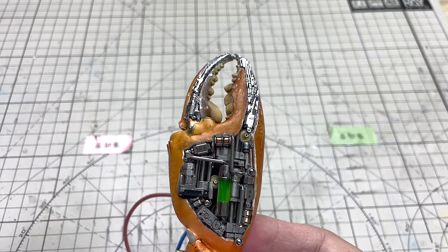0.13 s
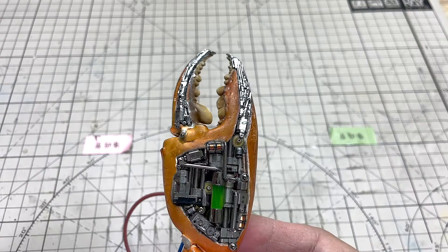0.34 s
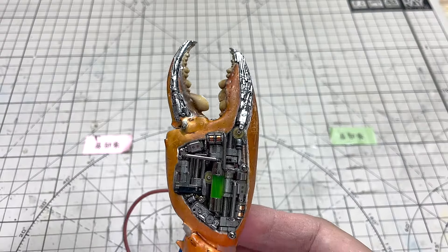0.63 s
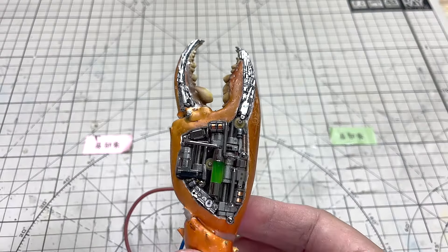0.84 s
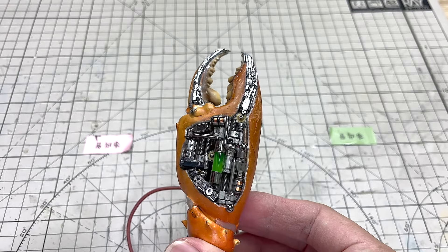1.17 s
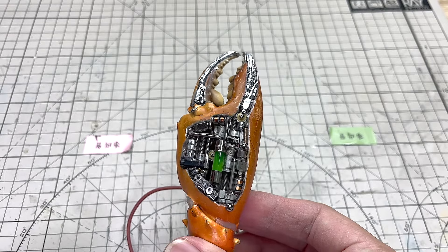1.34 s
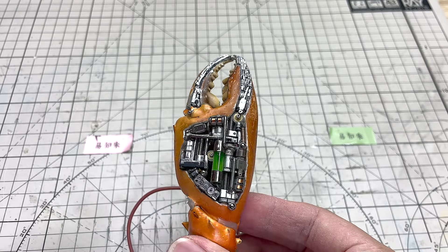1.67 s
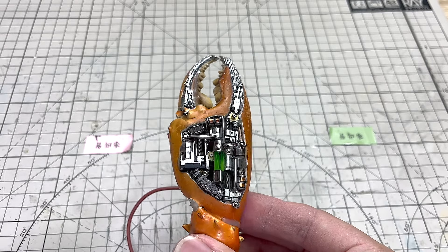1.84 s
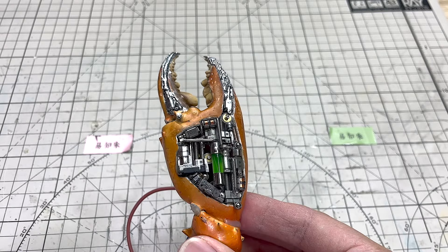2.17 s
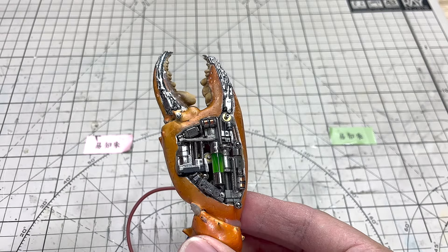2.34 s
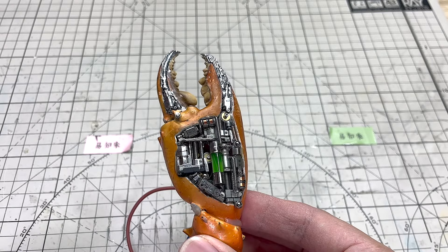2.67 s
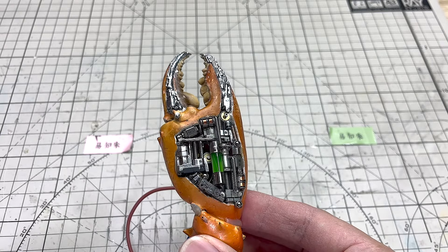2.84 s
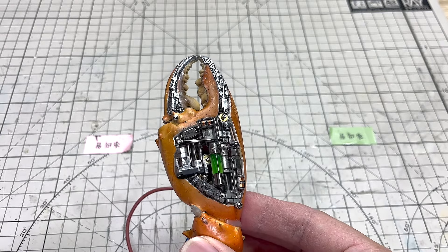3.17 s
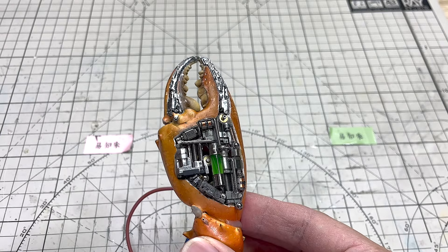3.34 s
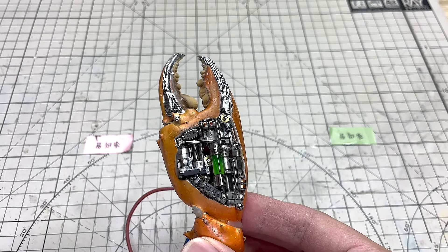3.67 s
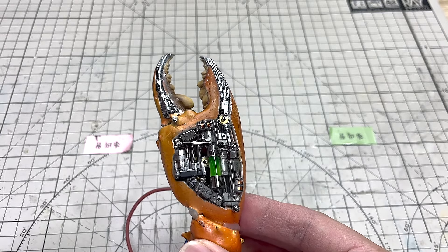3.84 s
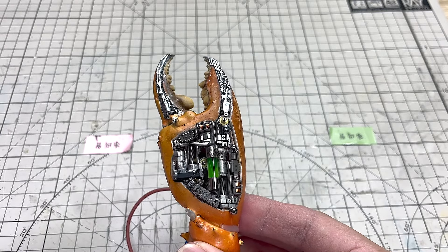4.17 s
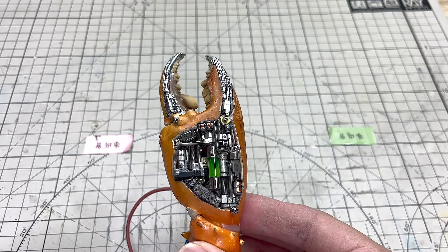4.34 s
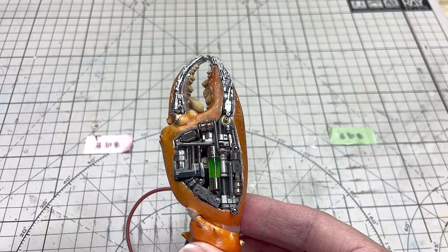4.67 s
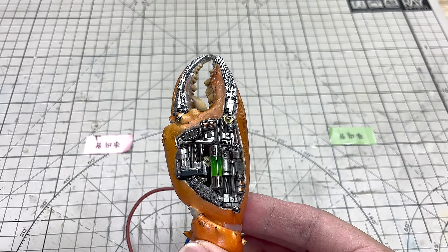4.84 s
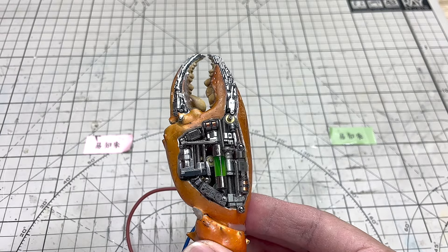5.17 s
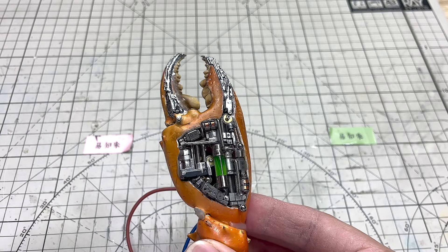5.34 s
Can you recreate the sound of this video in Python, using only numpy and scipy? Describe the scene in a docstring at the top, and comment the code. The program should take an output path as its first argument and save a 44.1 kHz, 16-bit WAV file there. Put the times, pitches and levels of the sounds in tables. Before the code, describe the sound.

Fizzy, metallic gear rattle runs throughout, thin and treble-heavy, recorded in stereo at a worktable. A very short louder start cuts to a steadier, more distant whir. Three times the motor strains, slows and sings sharply, then springs back to speed. Between the first and second strains a muted bump hits the bench. Beneath lie low room rumble and a faint swelling deep drone.

```python
"""Bright hiss of gear teeth in a hand-held mechanical claw, driven by a tiny three-pole motor: noise through
shell resonances. At each jaw closing the motor labours and slows, and the teeth sing clean shaft-locked sines.
Beneath: low room rumble (shaped noise), a swelling drone and a faint hum. Once, a soft thump on the bench
(pulses into decaying modes); later a faint tone in two swells (gliding sine). Two microphone ports.
The first 44 ms are heard from closer, louder and brighter.
"""
import sys
import numpy as np
from scipy import signal
from scipy.fft import rfft, irfft
from scipy.io import wavfile

SR = 44100
rng = np.random.default_rng(int(sys.argv[2]) if len(sys.argv) > 2 else 0)


def log_audio(samples):
    """Write samples as a 16-bit WAV file to the path given in sys.argv[1]."""
    # one column per channel
    frames = np.atleast_2d(samples).T
    # limit to full scale, then quantise
    limited = np.clip(frames, -1, 1)
    pcm = np.round(limited * 32767).astype(np.int16)
    wavfile.write(sys.argv[1], SR, pcm)


N = 242991
T_S = np.arange(N) / SR
HZ = np.fft.rfftfreq(N, 1 / SR)[1:]   # DC left out

# Shaft-locked lines, 3 poles and 9 pinion teeth: multiple of shaft speed/1,
# line amplitude re rattle rms, running free/dB, labouring/dB
SHAFT_LINES = [(3, -13, -8), (4, -15.5, -13), (5, -26, -23), (6, -25, -12.5), (7, -21, -30), (8, -27, -30),
               (9, -19, -14.5), (10, -24, -25), (11, -23, -21), (12, -27, -20), (13, -27, -23),
               (14, -32, -23), (15, -30, -16.5), (18, -30, -20), (20, -35, -23), (21, -35, -18),
               (23, -23, -21), (24, -35, -20), (27, -35, -13), (30, -35, -20), (33, -35, -15),
               (36, -35, -13), (39, -35, -16), (42, -35, -18), (45, -35, -19), (48, -35, -19),
               (51, -35, -15.5), (52, -35, -19), (55, -35, -19), (57, -32, -12), (60, -30, -14.5)]
# Rattle throb with the turning parts: multiple of shaft speed/1, depth free/dB, depth labouring/dB
RATTLE_THROBS = [(.36, .5, 1.5), (1, .4, .7), (2, .6, .4), (3, .9, 1.2), (9, .3, 2.2)]
# Shell radiation slope: f/Hz, gain/dB
SHELL_SLOPE = [(300, -37.5), (600, -25.5), (1000, -18.5), (1400, -23.5), (1850, -14.5), (2100, -6),
               (3000, 2.5), (4300, -5.5), (7200, -6), (8600, -1.5), (10400, -4.5), (12000, 1),
               (13500, -1.5), (14600, -6.5), (15500, -22)]
# Shell resonances: f/Hz, width/Hz, gain above slope/dB
SHELL_RESONANCES = [(2110, 110, 4), (2600, 99, 0), (5205, 520, 11.5), (5990, 510, 6.5), (6510, 250, 4),
                    (8012, 996, 16.5), (9160, 810, -8.5), (13900, 390, -1)]
# Two microphone ports: f/Hz, right re left/dB, right leads by/turns, likeness/0-1
PORT_DIFFERENCES = [(300, 0, -.05, .7), (750, -1.5, -.23, .85), (1100, -1, -.17, .75),
                    (1600, -1.5, -.1, .6), (2400, -4, -.17, .65), (3200, -9, -.38, .6),
                    (4200, -7, -.75, .2), (4900, -1, -1.0, .9), (5300, -5, -.93, .8), (5750, -3, -.65, .35),
                    (6400, -1, -.83, .6), (7100, -2, -.55, .4), (7900, -2, -.58, .92), (8350, 0, -.5, 1),
                    (9100, 0, -.5, 1), (10500, 0, -.33, .65), (12500, 0, -.09, .85), (12950, 0, 0, 1)]
# Rumble spectrum shape: f/Hz, relative level per Hz/dB
RUMBLE_SPECTRUM = [(30, -9), (50, -10.5), (80, -1), (105, -2), (140, -9.5), (200, -8.5), (300, -16.5),
                   (470, -27), (600, -36), (800, -58)]
# Rumble likeness between ports: f/Hz, likeness/0-1
RUMBLE_LIKENESS = [(60, 0.75), (200, 0.82), (600, 0.03)]
# Faint tone, two swells: t/s, f/Hz, level/dB
FAINT_TONE_TRACK = [(3.36, 670, -100), (3.39, 683, -74), (3.42, 710, -73), (3.45, 696, -85),
                    (3.485, 716, -70), (3.52, 710, -95), (3.6, 710, -100)]
# Contacts on the bench: t/s, level/dB, hardness/(dB per octave)
BENCH_CONTACTS = [(2.45, -61, 2.5), (2.468, -59.5, 3), (2.489, -51, -5.5), (2.546, -58.5, -2),
                  (2.585, -62.5, -4)]
# Bench-top modes: f/Hz, level/dB, t60/s
BENCH_MODES = [(54.6, -8, 0.25), (72, -1.5, 0.15), (125, -2, 0.13), (169.5, -5, 0.46), (192, -11, 0.31),
               (312, -11.5, 0.17), (427, -8, 0.1)]
# Gain of the closer sound over the farther one: f/Hz, gain/dB
CLOSER_GAIN = [(60, 6.5), (120, 2), (250, 19), (600, 4), (1500, 5), (3500, 10.5), (7000, 8), (11000, 4),
               (13000, 17), (15000, 20)]
# Frequency bands of the claw sound, flickering partly together and partly apart: upper edge f/Hz,
# slope/(dB per unit sheen), slope/(dB per unit load), share of treble level/0-1
CLAW_BANDS = [(1116, 1.5, -6.5, 0), (1754, 3.5, 5, 0), (3260, 0.86, -4, 0), (4730, -1.5, -4.5, 0.48),
              (7680, -0.5, -0.5, 0.16), (8800, -4.5, 0, 0.4), (9220, -6, 10, 0.37), (10350, 11.5, -1, 1),
              (20000, -1.3, -2.5, 0.86)]
# Deep drone resonance: f/Hz, width/Hz
DRONE_RESONANCE = (52.5, 24)
# Jaw closings: t/s, slowest speed/(turns/s), mid-band strain/dB, treble strain/dB, squeal on the way
# down and up/dB, squeal at the slowest/dB, upper squeal/dB, pole hum/dB
JAW_CLOSINGS = [(-0.12, 222, 0, 0, -5, -15, -10, 0), (1.534, 222, 1, -1.5, -8, -4, -7, -1.5),
                (3.188, 224, -.5, 0, -4, -24, -3, -2), (4.83, 221.6, -.7, 0, -2.5, -24, -10, -3)]
# Shaft slow-down over a cycle: t from closing/s, share of slow-down/1 (< 0: freed motor overshoots)
SHAFT_SLOWING = [(-.4, -.04), (-.2, 0), (-.15, .03), (-.11, .17), (-.08, .39), (-.055, .65), (-.03, .89),
                 (0, 1), (.03, .87), (.055, .75), (.08, .53), (.11, .29), (.15, 0), (.22, -.11), (.33, -.1),
                 (.45, 0), (.6, .06), (.77, .03), (.9, -.04), (1.05, -.09), (1.26, -.04)]
# Rattle over a cycle (strain, slack, jaws open): t from closing/s, mid-band level/dB, treble level/dB
RATTLE_LEVELS = [(-.4, -44.5, -39.5), (-.16, -44.5, -37.5), (-.07, -42.5, -31), (-.02, -40, -32),
                 (.07, -42, -32.5), (0.152, -45.5, -42), (.32, -46.5, -41), (.42, -45.5, -39),
                 (.65, -44, -36.5), (.85, -45, -40), (1.1, -45.5, -41), (1.26, -46, -40.5)]
# Brief flares of the rattle: t/s, rise/dB
RATTLE_FLARES = [(.24, 3.5), (1.09, 3), (1.96, 1), (3.69, 1.5), (4.22, 4), (5.401, 3)]
# Colour drift from 9-11 kHz towards 5-8 kHz: t/s, sheen/0-1
SHEEN_TRACK = [(0, 1), (.7, 1), (1.0, 0.85), (1.7, 0.57), (2.0, 0), (3.5, 0.2), (5.51, 0.23)]
# Drone swells: t/s, level above rest/dB
DRONE_SWELLS = [(.19, 11), (.83, 14.5), (1.2, 8.5), (1.5, 6.5), (1.89, -2), (2.8, 7), (3.45, 7.5),
                (3.92, 8), (4.3, 4.5), (4.591, 1), (5.26, 4.5), (5.5, 8)]

FREE_TURNS_PER_S, LABOURING_TURNS_PER_S = 257, 224
CYCLE_LEAD_S = .4   # a cycle starts this long before the jaws meet
MESH_PLAY_TURNS = .0017   # play between teeth, blurs the high lines
STUTTER_TURNS, HIGHEST_HUM_MULTIPLE = .012, 7
SQUEAL_MULTIPLE, UPPER_MULTIPLE = 54, 63   # six and seven times the tooth rate
SQUEAL_LOUDEST_HZ, SQUEAL_RANGE_HZ, SQUEAL_SLOWEST_POWER = 12850, 520, 3.0
FLARE_S = 0.02
DULL_DB, DULL_BELOW_HZ = -40, 2100   # lowest bands: base level does not follow the cycle
FINE_SPACING_HZ, FINE_DB, FINE_UP_TO_HZ = 35, 2.4, 8000   # fine random ripple of the shell response
CLOSER_UNTIL_S, CLOSER_FADE_S = 0.0442, 0.003
RUMBLE_DB, RUMBLE_WANDER_DB, DRONE_DB = -68, 1.4, -68.5
SWELL_RISE_DB_PER_S, SWELL_FALL_DB_PER_S, RUMBLE_DB_PER_SWELL_DB = 112, 27, 0.098
AFTER_THUMP_DB, AFTER_THUMP_S = 9.5, 0.3
HUM_HZ, HUM_DB, HUM_WAVER_DB = 194.5, -76.5, 4
CUTOFF_HZ = 15750


def amp(db):
    """dB to amplitude ratio."""
    return 10 ** (np.asarray(db) / 20)


def rms_one(x):
    """Scale to rms 1."""
    return x / np.sqrt(np.mean(x ** 2))


def in_time(rows):
    """Table columns interpolated at every sample."""
    s, *columns = np.transpose(rows)
    return [np.interp(T_S, s, column) for column in columns]


def over_hz(rows):
    """Table columns interpolated over log frequency."""
    hz, *columns = np.transpose(rows)
    return [np.interp(np.log(HZ), np.log(hz), column) for column in columns]


def shaped(x, response):
    """Filter by a complex frequency response."""
    return irfft(rfft(x) * np.append(0, response), N)


def resonance(hz, width_hz):
    """Bell over frequency, peak 1, half height at half a width from centre."""
    return 1 / (1 + (2 * (HZ - hz) / width_hz) ** 2)


def sine(turns):
    """Sine of a phase in turns."""
    return np.sin(2 * np.pi * turns)


def drift(rate_hz):
    """Slow chance: noise twice low-passed, run in for 0.5 s, rms 1."""
    r = np.exp(-2 * np.pi * rate_hz / SR)
    noise = rng.standard_normal(N + SR // 2)
    return rms_one(signal.lfilter([1], [1, -2 * r, r * r], noise)[SR // 2:])


def cycle():
    """Time from the current closing, and that closing's columns, at every sample."""
    t_s = np.maximum(T_S, CLOSER_UNTIL_S)   # cycle stands still until then
    rows = np.array(JAW_CLOSINGS)
    current = rows[np.searchsorted(rows[:, 0] - CYCLE_LEAD_S, t_s) - 1]
    return t_s - current[:, 0], *current[:, 1:].T


def tooth_rattle(turns, load):
    """Uneven teeth: two unrelated noises under one throb locked to the shaft."""
    throb_db = 0
    for k, free_db, hard_db in RATTLE_THROBS:
        depth_db = free_db + (hard_db - free_db) * load
        throb_db = throb_db + depth_db * np.cos(2 * np.pi * (k * turns + rng.random()))
    return rng.standard_normal((2, N)) * amp(throb_db + 1.0 * drift(1200))


def tooth_squeal(turns, speed, slowing, load, flank_db, bottom_db, upper_db):
    """Tooth-rate harmonics: one sings in a band the shell favours and when slowest, one grows with load."""
    in_range = np.exp(-((SQUEAL_MULTIPLE * speed - SQUEAL_LOUDEST_HZ) / SQUEAL_RANGE_HZ) ** 2)
    at_slowest = np.clip(slowing, 0, 1) ** SQUEAL_SLOWEST_POWER
    level = amp(flank_db) * in_range + amp(bottom_db) * at_slowest
    squeal = level * amp(2.5 * drift(60)) * sine(SQUEAL_MULTIPLE * turns)
    upper = amp(upper_db + 2 * drift(40)) * load ** 2 * sine(UPPER_MULTIPLE * turns)
    return squeal + upper


def shaft_lines(turns, load, hum_db):
    """Poles and teeth sing sines at multiples of shaft speed."""
    stutter_turns = STUTTER_TURNS * load * drift(23)   # labouring armature stumbles, blurs its hum
    out = 0
    for k, free_db, hard_db in SHAFT_LINES:
        is_hum = k <= HIGHEST_HUM_MULTIPLE
        level_db = free_db + (hard_db - free_db) * np.minimum(1.4 * load, 1)
        level_db = level_db + is_hum * hum_db * load
        level_db = level_db + min(2 + k / 12, 3) * drift(15)
        out = out + amp(level_db) * sine(k * (turns + is_hum * stutter_turns) + rng.random())
    return out


def band_levels(force, since_s, load, mid_strain_db, treble_strain_db):
    """Split the force into bands; set each level by cycle, sheen, load, shared and separate flicker."""
    s, mid_db, treble_db = np.transpose(RATTLE_LEVELS)
    flare_db = sum(db * np.exp(-((T_S - at_s) / FLARE_S) ** 2) for at_s, db in RATTLE_FLARES)
    mid_db = np.interp(since_s, s, mid_db) + flare_db + mid_strain_db * load
    treble_db = np.interp(since_s, s, treble_db) + flare_db + treble_strain_db * load
    sheen, = in_time(SHEEN_TRACK)
    together = drift(15.0)
    spectrum = rfft(force)
    out, below = 0, 0
    for edge_hz, sheen_db, load_db, share in CLAW_BANDS:
        low_pass = np.append(1, 1 / (1 + (HZ / edge_hz) ** 30))
        base_db = mid_db + share * (treble_db - mid_db) if edge_hz > DULL_BELOW_HZ else DULL_DB
        flicker_db = 0.47 * together + 0.73 * drift(22) + 0.64 * drift(23)
        level_db = base_db + sheen_db * sheen + load_db * load + flicker_db
        out = out + irfft(spectrum * (low_pass - below), N) * amp(level_db)
        below = low_pass
    return out


def motor():
    """Shaft slows under load; returns rattle + lines, unrelated rattle, and lines as force on the shell."""
    (since_s, slowest, mid_strain_db, treble_strain_db,
     flank_db, bottom_db, upper_db, hum_db) = cycle()
    slowing = np.interp(since_s, *np.transpose(SHAFT_SLOWING))
    speed = FREE_TURNS_PER_S - (FREE_TURNS_PER_S - slowest) * slowing
    slowed = (FREE_TURNS_PER_S - speed) / (FREE_TURNS_PER_S - LABOURING_TURNS_PER_S)
    load = np.clip(slowed, 0, 1) ** .7
    uneven_speed = speed * (1 + .0016 * drift(30) + .002 * drift(4))
    turns = np.cumsum(uneven_speed) / SR + MESH_PLAY_TURNS * drift(150)
    rattle = tooth_rattle(turns, load)
    lines = tooth_squeal(turns, speed, slowing, load, flank_db, bottom_db, upper_db)
    lines = lines + shaft_lines(turns, load, hum_db)
    force = np.array([rattle[0] + lines, rattle[1], lines])
    return band_levels(force, since_s, load, mid_strain_db, treble_strain_db)


def shell_response():
    """Radiation slope plus resonances plus a fine random ripple up to about 8 kHz, as amplitude."""
    slope_db, = over_hz(SHELL_SLOPE)
    modes_db = sum(db * resonance(hz, width_hz) for hz, width_hz, db in SHELL_RESONANCES)
    ripple_hz = np.arange(0, SR / 2, FINE_SPACING_HZ)
    fine_db = FINE_DB * np.interp(HZ, ripple_hz, rng.standard_normal(len(ripple_hz)))
    fine_db = fine_db * (HZ > DULL_BELOW_HZ) / (1 + (HZ / FINE_UP_TO_HZ) ** 4)
    return amp(slope_db + modes_db + fine_db)


def claw():
    """Shell colours the force; the ports differ in level, phase and likeness of the rattle."""
    force, scattered, lines = motor()
    shell = shell_response()
    right_db, lead_turns, alike = over_hz(PORT_DIFFERENCES)
    path = shell * amp(right_db) * np.exp(2j * np.pi * lead_turns)
    right = shaped(force, path * alike)
    right = right + shaped(scattered, path * np.sqrt(1 - alike ** 2))
    right = right + shaped(lines, path * (1 - alike))   # lines stay whole
    return np.array([shaped(force, shell), right])


def closer_start(far):
    """The first 44 ms sound closer, louder and brighter; a 3 ms crossfade leads to the farther sound."""
    closer = np.clip((CLOSER_UNTIL_S - T_S) / CLOSER_FADE_S, 0, 1)
    return far * (1 - closer) + shaped(far, amp(over_hz(CLOSER_GAIN)[0])) * closer


def rumble(swell_db):
    """Low noise, partly alike in both ports; follows the drone slightly, stirred by the thump."""
    colour = amp(over_hz(RUMBLE_SPECTRUM)[0])
    alike = np.clip(over_hz(RUMBLE_LIKENESS)[0], 0, 1)
    mid, side = rng.standard_normal((2, N))
    mid = shaped(mid, colour * np.sqrt(1 + alike))
    side = shaped(side, colour * np.sqrt(1 - alike))
    after_s = T_S - BENCH_CONTACTS[0][0]
    stirred_db = AFTER_THUMP_DB * np.exp(-np.abs(after_s) / AFTER_THUMP_S) * (after_s > 0)
    level_db = RUMBLE_DB + RUMBLE_DB_PER_SWELL_DB * swell_db + stirred_db
    level_db = level_db + RUMBLE_WANDER_DB * drift(2.4)
    return amp(level_db) * rms_one(mid + side * [[1], [-1]])


def drone(swell_db):
    """Noise through one resonance: a wavering deep tone that swells and dies away."""
    tone = rms_one(shaped(rng.standard_normal(N), resonance(*DRONE_RESONANCE)))
    return amp(DRONE_DB + swell_db) * tone


def machine_hum():
    """Distant machine tone: sine with slowly drifting level and phase."""
    level_db = HUM_DB + HUM_WAVER_DB * drift(1.7)
    return amp(level_db) * np.sin(2 * np.pi * HUM_HZ * T_S + drift(2.8))


def thump():
    """Soft contacts ring the bench-top modes, each strength slightly random; low-passed at 470 Hz."""
    at_s, contact_db, hardness_db = np.transpose(BENCH_CONTACTS)
    at = np.round(at_s * SR).astype(int)
    out = 0
    for k, (hz, mode_db, t60_s) in enumerate(BENCH_MODES):
        blow_db = contact_db + mode_db + hardness_db * np.log2(hz / 128)
        blow_db = blow_db + rng.normal(0, 1.1, len(at))
        blows = np.zeros(N) + 1e-18   # avoids denormals
        blows[at] = (-1) ** (k // 2 + 1) * amp(blow_db)
        r = amp(-60 / (t60_s * SR))
        w = 2 * np.pi * hz / SR
        out = out + signal.lfilter([0, np.sin(w)], [1, -2 * r * np.cos(w), r * r], blows)
    return signal.sosfilt(signal.butter(4, 470, fs=SR, output="sos"), out)


def faint_tone():
    """Sine of gliding pitch that rises briefly, in two swells."""
    hz, level_db = in_time(FAINT_TONE_TRACK)
    return amp(level_db) * sine(np.cumsum(hz) / SR)


def room():
    """Rumble, drone, hum and faint tone; right port 1.6 dB above left."""
    swells_db = []
    for s, db in DRONE_SWELLS:
        ramp_db = np.maximum(SWELL_RISE_DB_PER_S * (s - T_S), SWELL_FALL_DB_PER_S * (T_S - s))
        swells_db.append(db - ramp_db)
    swell_db = np.max(swells_db, axis=0).clip(0)
    tones = drone(swell_db) + machine_hum() + faint_tone()
    return (rumble(swell_db) + tones) * amp([[-.8], [.8]])


def scene():
    """Claw and room with the closer start; thump added alike to both ports."""
    return closer_start(claw() + room()) + thump()


def record(dry):
    """Microphone drops the deepest bass; the top is cut."""
    dry = signal.sosfilt(signal.butter(3, 38, "high", fs=SR, output="sos"), dry)
    return signal.sosfilt(signal.ellip(10, .5, 70, CUTOFF_HZ, fs=SR, output="sos"), dry)


dry = scene()
out = record(dry)
log_audio(out)
```